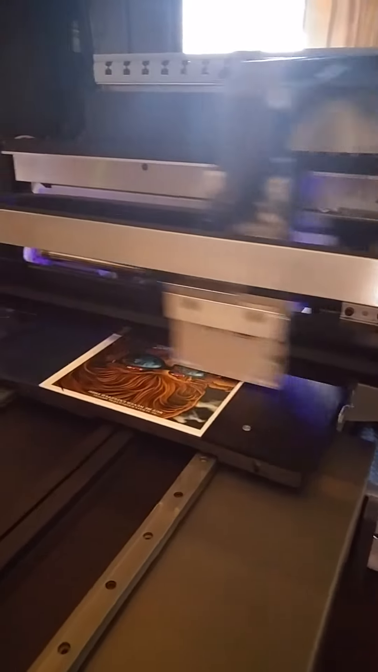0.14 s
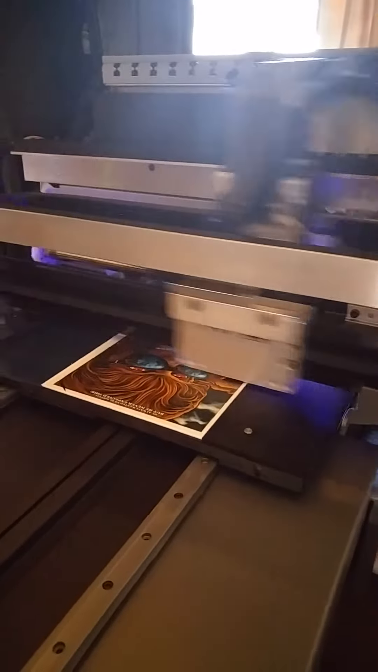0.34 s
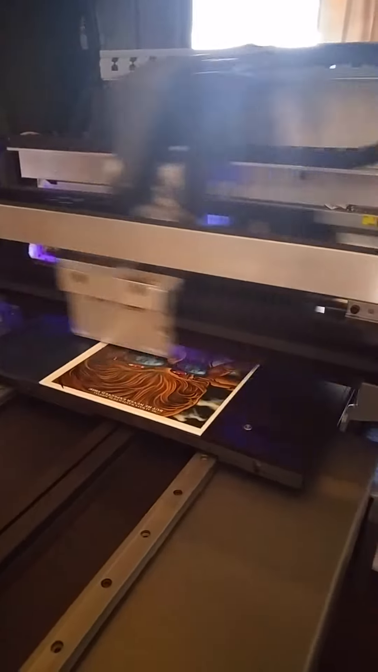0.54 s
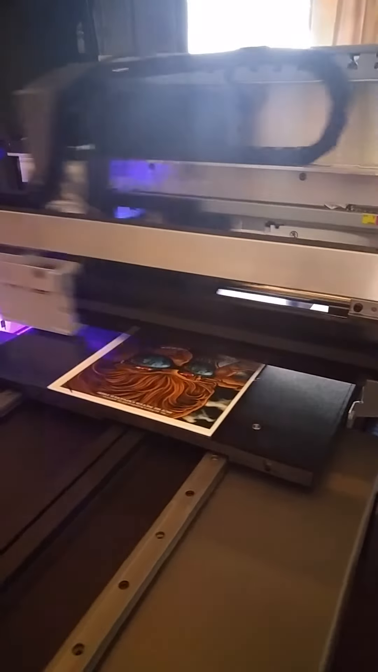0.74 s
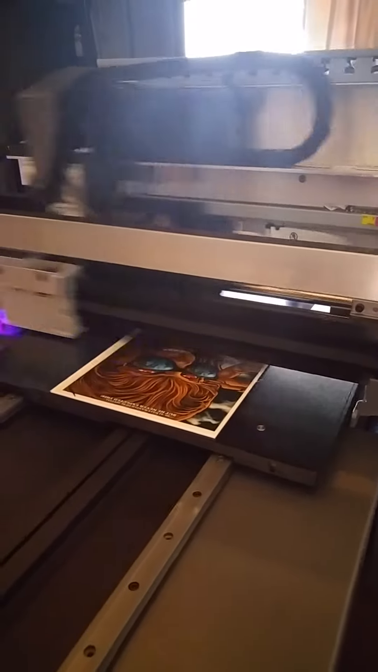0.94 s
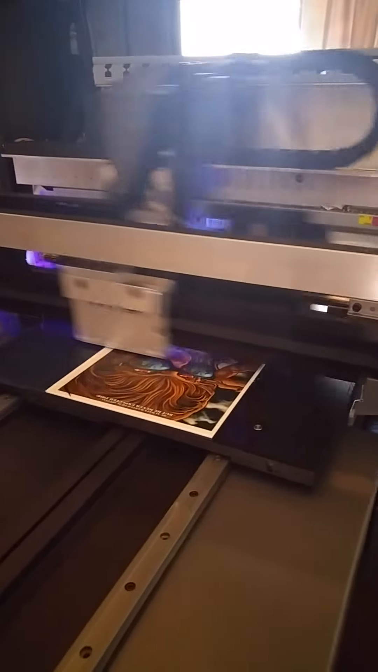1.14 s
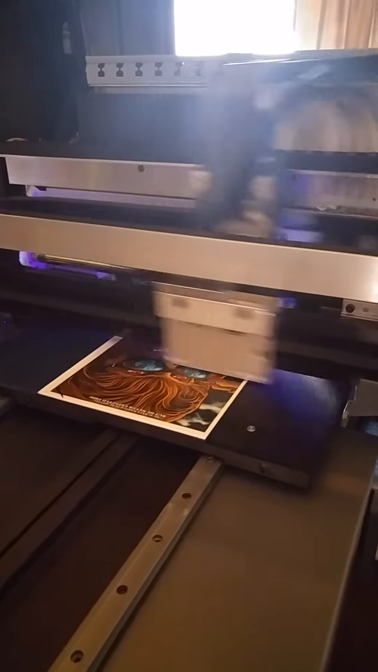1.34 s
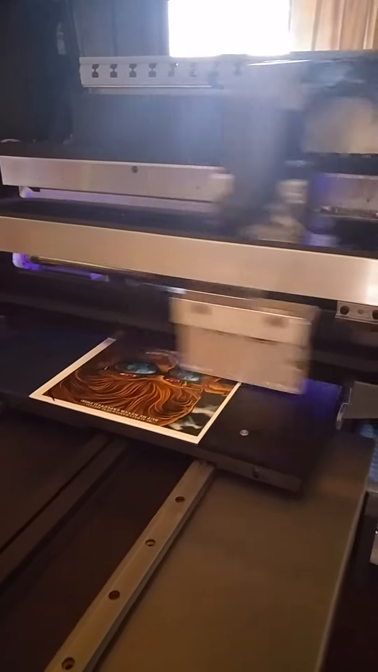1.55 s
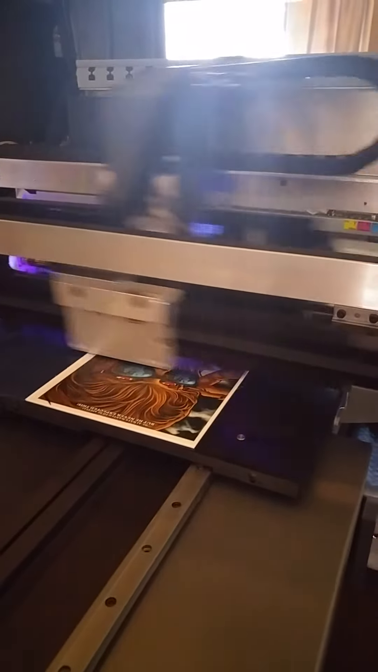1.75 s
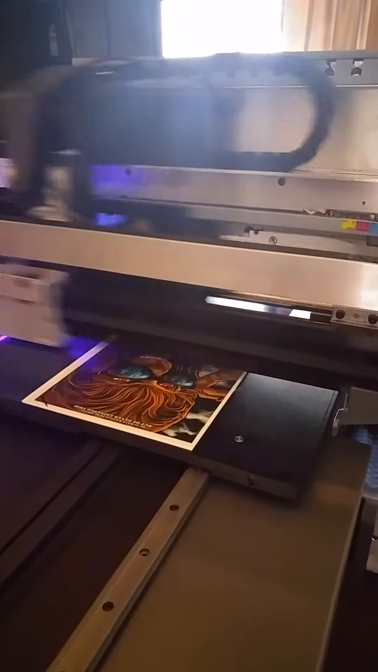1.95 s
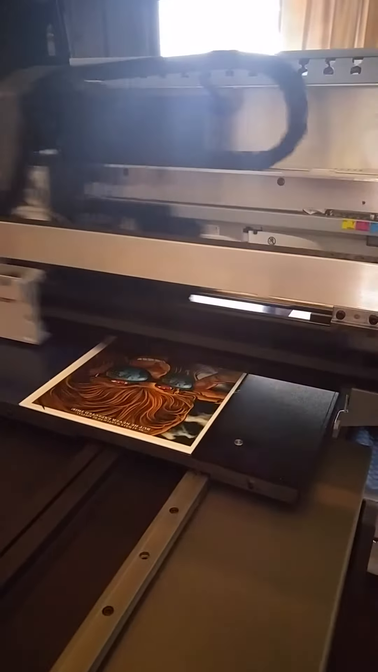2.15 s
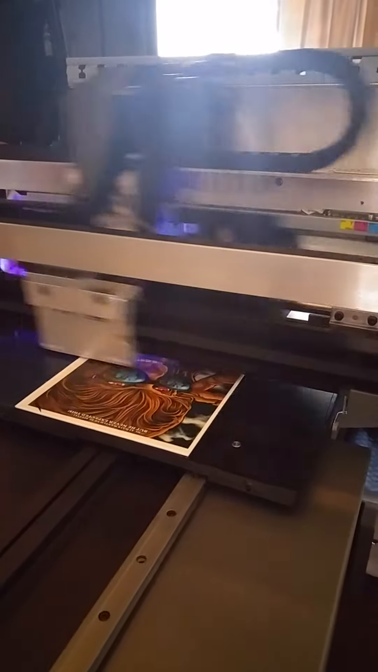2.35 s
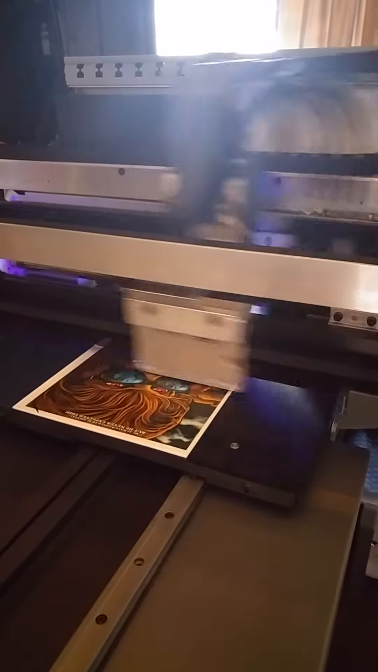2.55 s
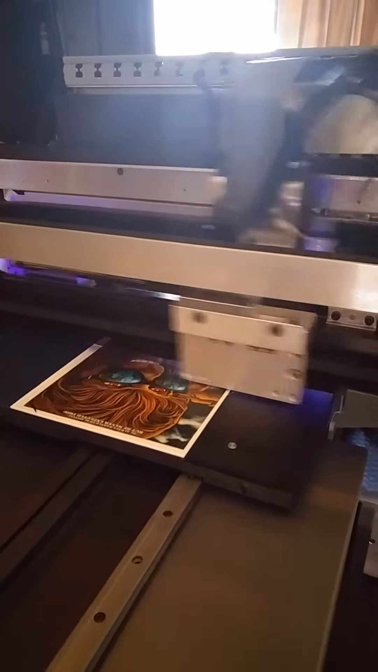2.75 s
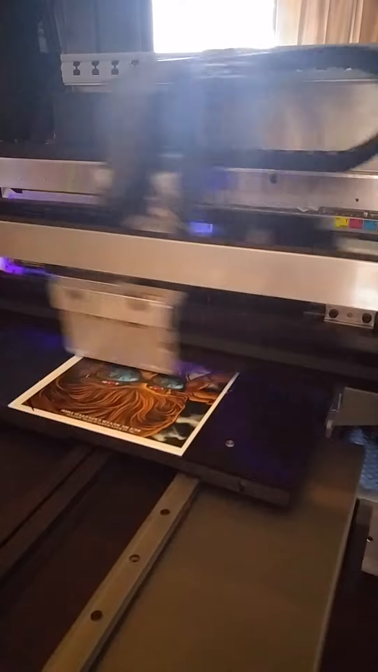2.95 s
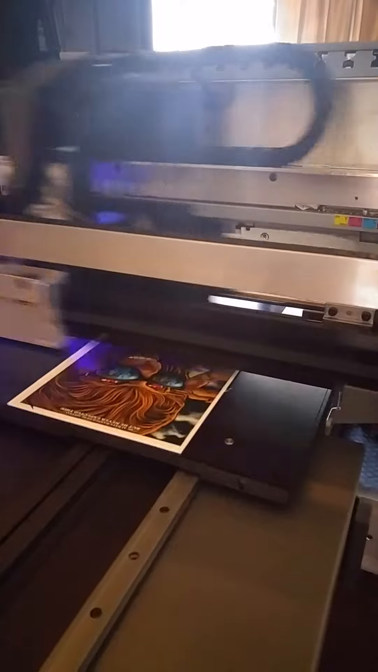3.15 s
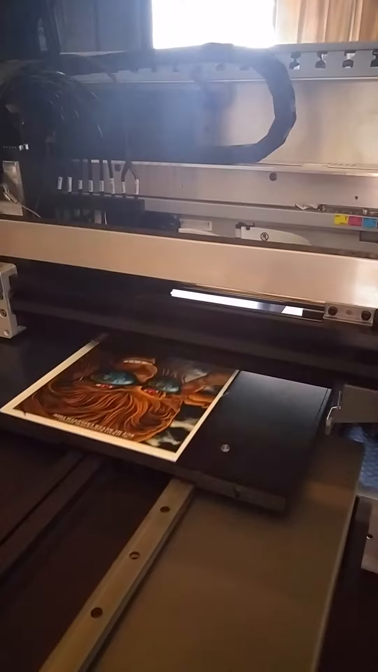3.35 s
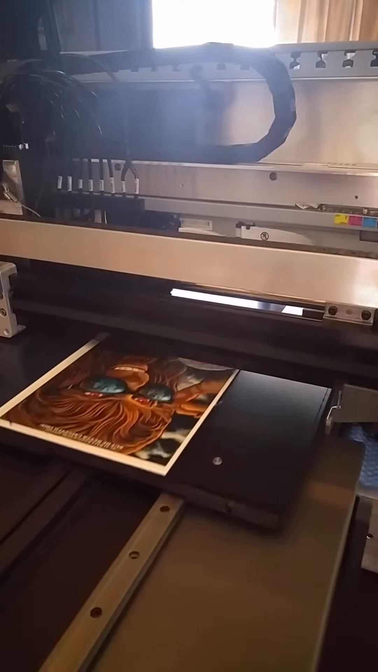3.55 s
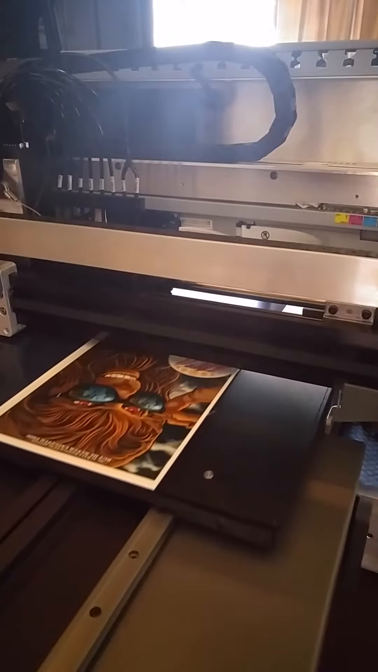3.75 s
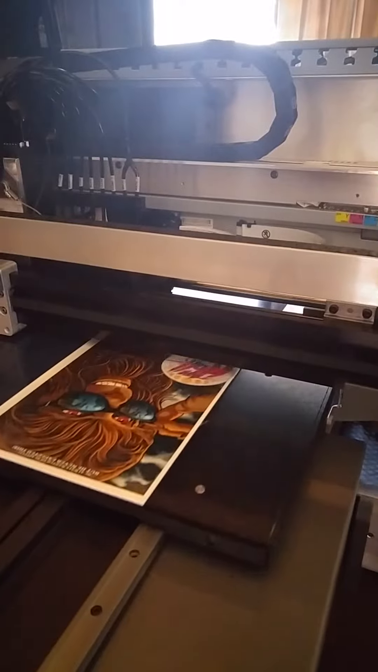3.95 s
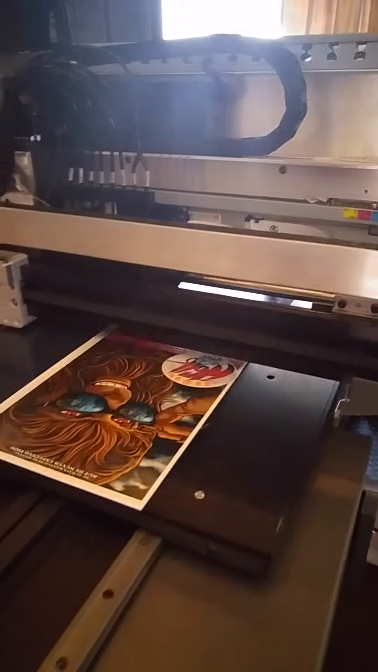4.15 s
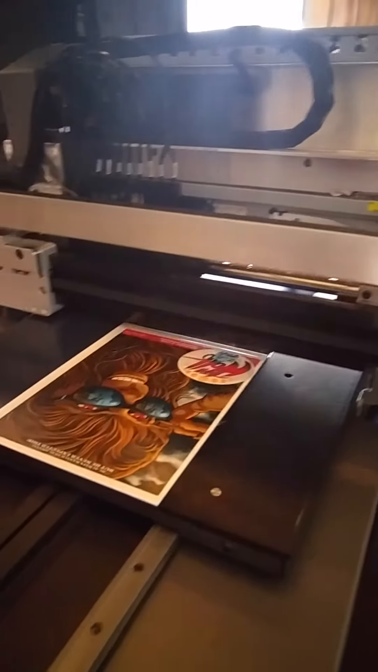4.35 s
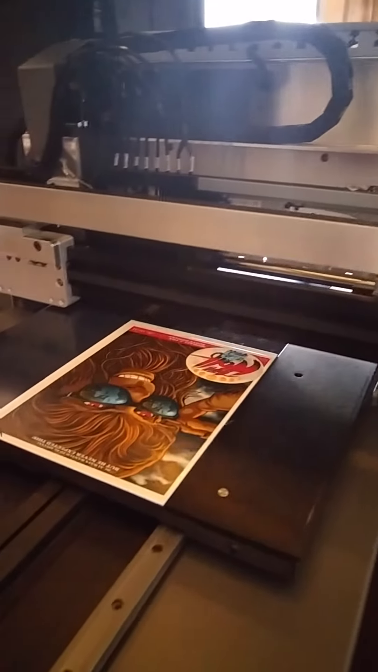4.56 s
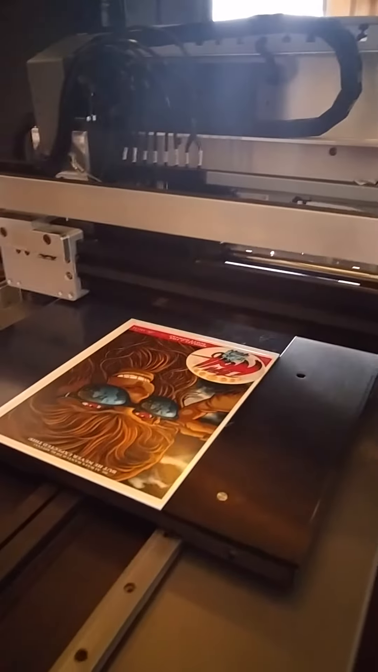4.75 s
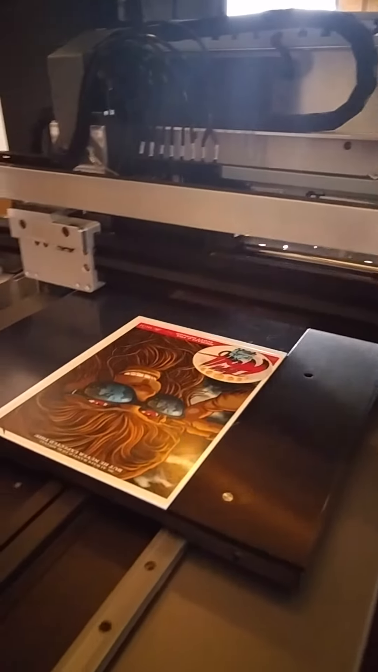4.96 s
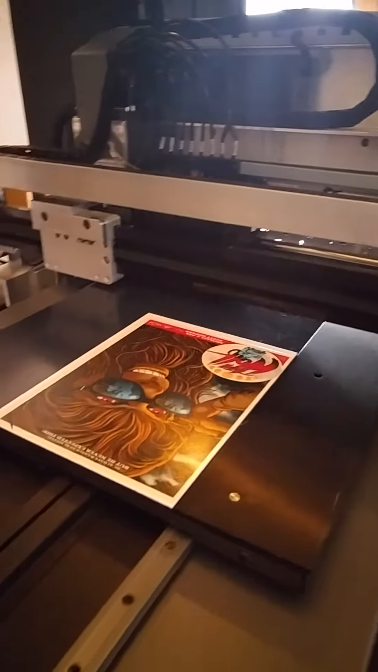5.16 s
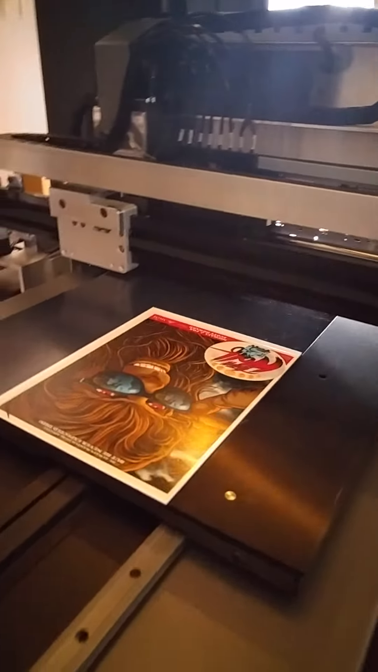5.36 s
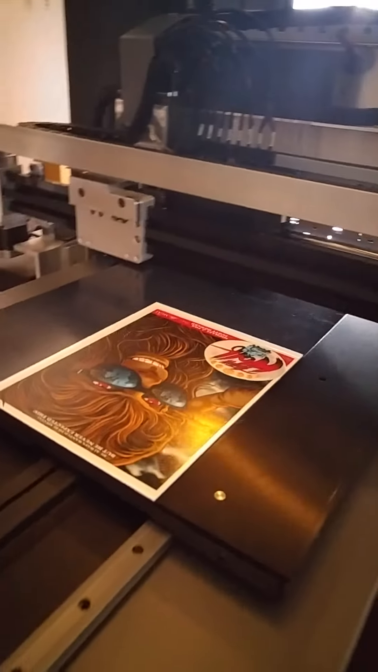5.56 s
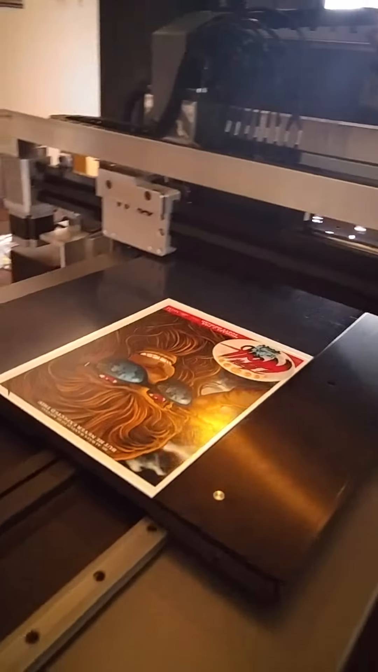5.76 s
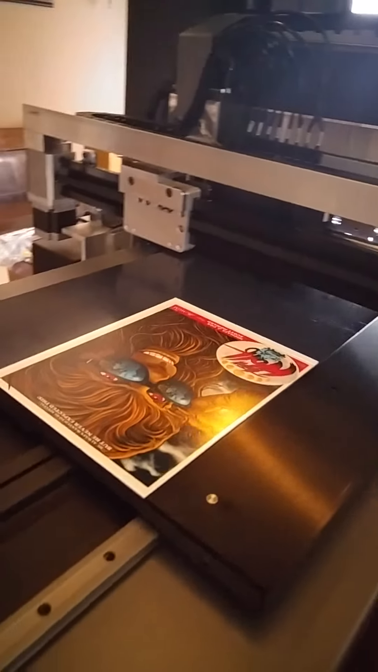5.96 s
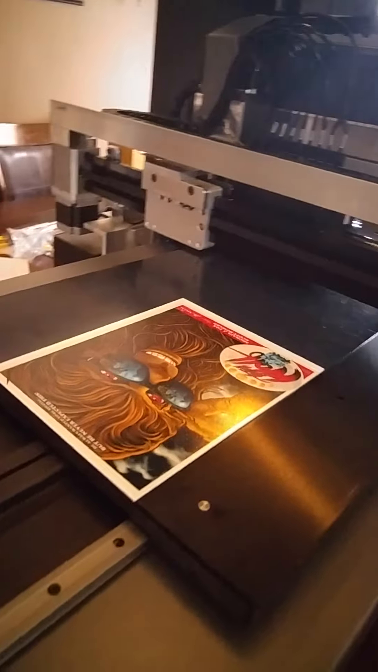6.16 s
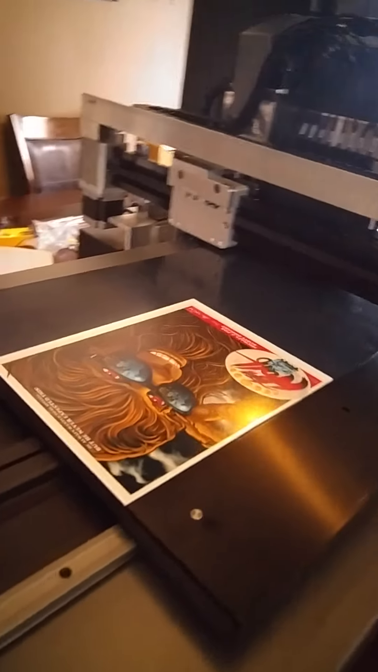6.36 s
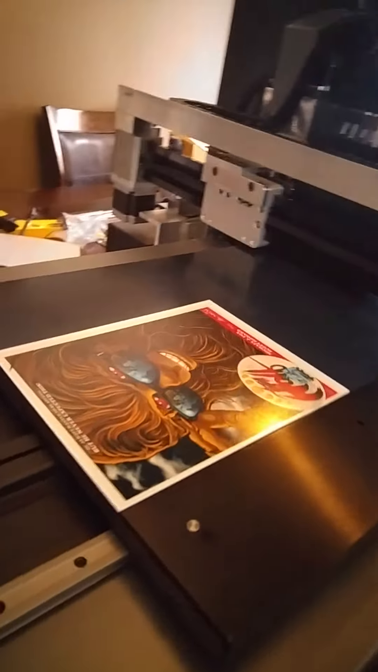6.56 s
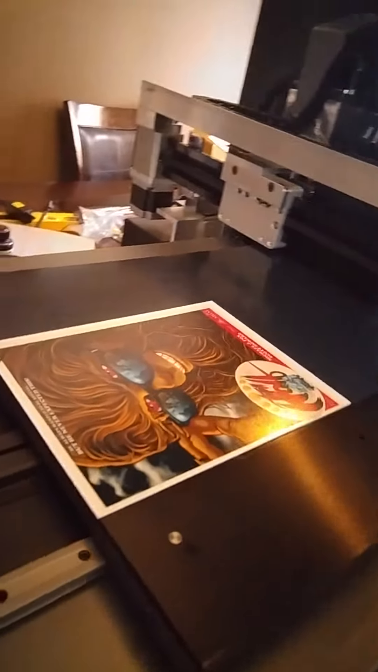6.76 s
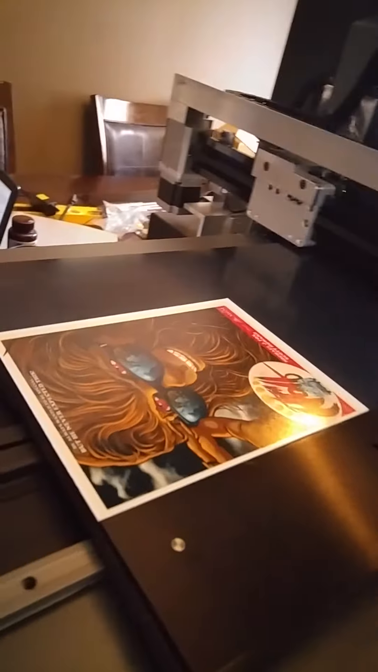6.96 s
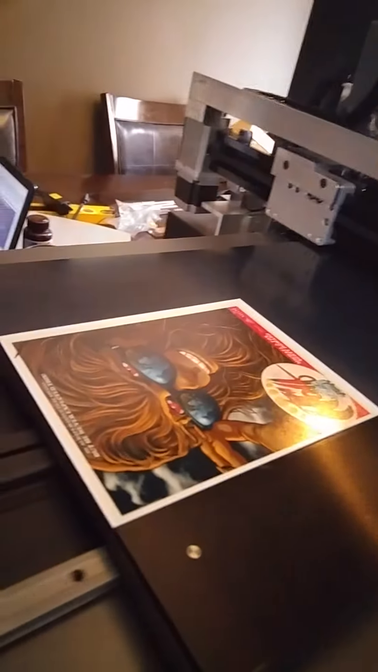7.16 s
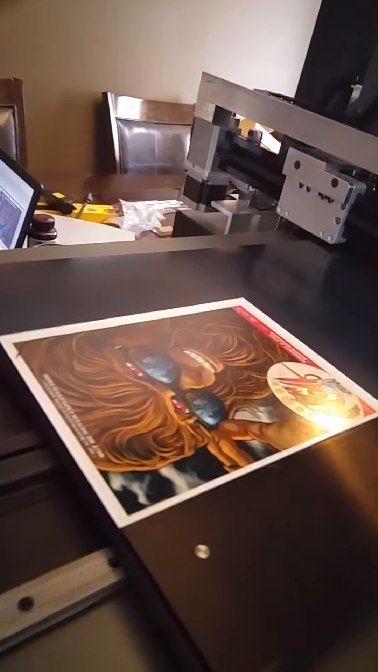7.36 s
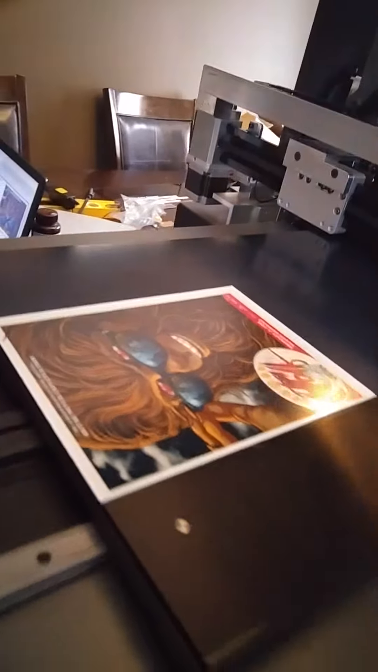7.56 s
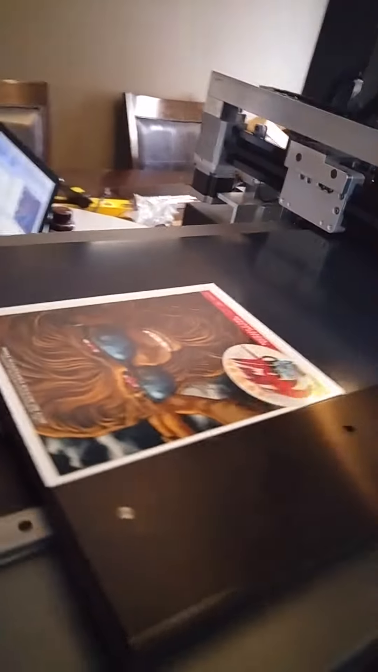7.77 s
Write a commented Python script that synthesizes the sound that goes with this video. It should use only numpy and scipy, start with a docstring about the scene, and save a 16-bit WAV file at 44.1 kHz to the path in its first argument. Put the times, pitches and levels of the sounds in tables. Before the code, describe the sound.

A printer carriage shuttles with rising and dipping motor whines over airy hiss, parks, then a throbbing bed-motor drone continues as the blower winds down.

```python
"""Flatbed printer, parking and printing

The carriage shuttles on its stepper motor: gliding whine, frame ring, rumble, chain rattle, far-end knocks.
A blower hisses and whines on it. The carriage parks and the bed motor drones with shaft-rate side tones.
The blower then runs down over a quieter fan. Tones are sines with a level per port and a left lead;
noises are shaped random spectra partly shared by the two microphone ports.
"""
import sys
import numpy as np
from scipy import signal
from scipy.io import wavfile
from scipy.ndimage import uniform_filter1d, map_coordinates

SR = 44100
rng = np.random.default_rng(int(sys.argv[2]) if len(sys.argv) > 2 else 0)


def log_audio(samples):
    """Write samples as a 16-bit WAV file to the path given in sys.argv[1]."""
    # one column per channel
    frames = np.atleast_2d(samples).T
    # limit to full scale, then quantise
    limited = np.clip(frames, -1, 1)
    pcm = np.round(limited * 32767).astype(np.int16)
    wavfile.write(sys.argv[1], SR, pcm)


N = 344862
T = np.arange(N) / SR


def gain_of(db):
    """Decibels to gain."""
    return 10 ** (np.asarray(db) / 20)


def evened(x):
    """Scales to rms 1."""
    return x / np.sqrt(np.mean(x ** 2) + 1e-20)


def columns(rows, at):
    """Interpolates every column of a table against its first."""
    x, *rest = np.transpose(rows)
    return [np.interp(at, x, c) for c in rest]


def wander(hz):
    """Slow random curve of rms 1, hz knots per second."""
    knots = rng.standard_normal(int(N / SR * hz) + 4)
    return evened(map_coordinates(knots, [T * hz], order=3))


def tone(angle, left_db, right_db, left_lead_rad):
    """A sine at both ports, levels as rms."""
    left = gain_of(left_db) * np.cos(angle)
    right = gain_of(right_db) * np.cos(angle - left_lead_rad)
    return np.sqrt(2) * np.array([left, right])


def resonate(x, hz, width_hz):
    """One-pole resonance of peak gain 1: shift hz down to zero, low-pass, shift back."""
    turn, r = np.exp(2j * np.pi * hz * T), np.exp(-np.pi * width_hz / SR)
    return 2 * (turn * signal.lfilter([1 - r], [1, -r], x / turn)).real


# noise at the ports: hz, likeness_0_1, left_lead_rad, left_minus_right_db
PORT_NOISE = [(40, 0.3, 2.2, -14), (150, 1, 1.6, -3), (402, 0.87, 0.42, -1), (1080, 0.85, 1.47, 0.5),
              (2050, 0.42, 1.75, -0.1), (7540, 0, 0.53, 4.5), (13000, 0, 0.63, 2)]


def noise(spectrum, patchy_db, bands_db=0):
    """Random short-time spectra with drifting patches and lasting bands, partly shared by the ports; rms 1."""
    frames, hz = N // 256 + 5, np.fft.rfftfreq(1024, 1 / SR)

    def read(rows):
        table_hz, *rest = np.transpose(rows)
        return [np.interp(np.log(hz + 1), np.log(table_hz), c)[:, None] for c in rest]

    same, lead, tilt_db = read(PORT_NOISE)
    same = np.clip(same, 0, 1)
    a, b, c, d, patches = rng.standard_normal((frames, 513, 5)).T
    patches = evened(uniform_filter1d(uniform_filter1d(patches, 10, 0), 8, 1))
    knots = uniform_filter1d(rng.standard_normal((2, 513, 8)), size=4, axis=1)
    bands = evened(signal.resample(knots, frames, axis=2)) if bands_db else 0  # nearby surfaces comb each port
    left = a + 1j * b
    right = same * left * np.exp(-1j * lead) + np.sqrt(1 - same ** 2) * (c + 1j * d)
    ports = np.array([left * gain_of(tilt_db / 2), right / gain_of(tilt_db / 2)])
    shape = gain_of(read(spectrum)[0] + patchy_db * patches + bands_db * bands)
    return evened(signal.istft(ports * shape, nperseg=1024, noverlap=768)[1][:, :N])


FIRST_PASS_S, PASS_S = .325, .6133  # a pass starts every PASS_S
BRAKE_S, LAST_BRAKE_S = .494, 3.272  # into the pass; from the beginning
PICKUP_S, STOP_S = .095, .073  # lengths of speeding up and of braking
OUT_LATE_S = .005  # the way out sets off later than the way back
TURN_LEAD_S = .043  # near turn to pass start


def place_s():
    """Seconds of travel from the near end of the rail."""
    return abs((T - FIRST_PASS_S + TURN_LEAD_S + PASS_S) % (2 * PASS_S) - PASS_S)


def trip_s():
    """Seconds into the round trip, way out first."""
    return (T - FIRST_PASS_S) % (2 * PASS_S)


def pass_s():
    """Seconds into the current pass."""
    return (T - FIRST_PASS_S) % PASS_S


def carriage_speed():
    """Share of full speed: rises quickly, holds, falls in a straight line, stays at zero once parked."""
    late_s = OUT_LATE_S * (trip_s() < PASS_S)
    rise = 1 - np.clip(1 - (pass_s() - late_s) / PICKUP_S, 0, 1) ** 4.0
    fall = np.clip(1 - (pass_s() - BRAKE_S) / STOP_S, 0, 1)
    return abs(uniform_filter1d(rise * fall * (T < LAST_BRAKE_S + STOP_S), size=300))


CARRIAGE_HZ = 349  # stepping rate at full speed


def step_angle(speed):
    """Phase of the carriage stepping rate, the running sum of speed."""
    return 2 * np.pi * CARRIAGE_HZ * np.cumsum(speed) / SR


def motor_effort():
    """Gain of the motor: braking is quieter than pulling."""
    return gain_of(-5.5 * uniform_filter1d(1. * (pass_s() > BRAKE_S), size=300))


# fourth multiple of the stepping rate, alike both ways: place_s, left_db, right_db, left_lead_rad
STEP_WHINE = [(.1, -21.5, -23.5, 0.9), (.22, -20, -24, 0.6), (.34, -17.5, -21, 1.5), (.41, -18.5, -21, 1.5),
              (.51, -25.5, -26.5, 1.15)]
# stepping rate itself: trip_s, left_db, right_db, left_lead_rad
STEP_LOW = [(.07, -42, -38.5, 0.96), (.49, -39.5, -36, 0.67), (.74, -61, -53, .2), (1.0, -42.5, -42, 0.86),
            (1.1, -38, -36, 1)]
RETURN_DB = 1.5  # the way back pulls harder


def carriage_motor():
    """Stepper whine at 1, 4 and 8 times the stepping rate, gliding and swelling with speed."""
    speed, trip = carriage_speed(), trip_s()
    angle = step_angle(speed)
    flutter = gain_of(1.14 * wander(60) + RETURN_DB * (trip > PASS_S))
    whine = speed ** 1.32 * motor_effort() * flutter * tone(4 * angle, *columns(STEP_WHINE, place_s()))
    octave = speed ** 4 * gain_of(3 * wander(12)) * tone(8 * angle, -51, -51, 2)
    low = speed ** 4 * gain_of(2 * wander(20)) * tone(angle, *columns(STEP_LOW, trip))
    return whine + octave + low


# resonances of the frame: hz, width_hz, level_db
FRAME_MODES = [(268, 340, -38.5), (668, 137, -23.5), (1041, 128, -18.5)]


def frame_ring():
    """Frame resonances driven by the fourth stepping multiple as it glides through them."""
    speed = carriage_speed()
    drive = (speed > .05) * motor_effort() * tone(4 * step_angle(speed), 0, -0.72, 0.93)
    out = 0
    for hz, width_hz, db in FRAME_MODES:
        out += gain_of(db) * resonate(resonate(drive, hz, 2 * width_hz), hz, width_hz)  # steep skirts
    return out


# carriage rumble spectrum: hz, density_db_per_hz
RAIL_SPECTRUM = [(100, -36), (345, -26), (520, -32.5), (620, -10), (760, -9), (900, -18), (1400, -12),
                 (2200, -68)]


def rail_rumble():
    """Shaped noise of the carriage on its rail, nearly level while it moves."""
    return gain_of(-34.5) * carriage_speed() ** 0.08 * noise(RAIL_SPECTRUM, patchy_db=1.2)


# white noise: hz, density_db_per_hz
WHITE = [(1, 0)]
# two rattles on the way back: trip_s, level_db, half_length_s
CHAIN_RATTLES = [(0.82, -28, .035), (1.05, -30, 0.056)]
CHAIN_REST_DB = -45  # between rattles


def cable_chain():
    """Noise through a narrow resonance, swelling twice in each round trip."""
    links = resonate(resonate(noise(WHITE, patchy_db=1.5), 1515, 160), 1518, 28)
    level = gain_of(CHAIN_REST_DB)
    for s, db, half_s in CHAIN_RATTLES:
        level = level + gain_of(db) * np.exp(-((trip_s() - s) / half_s) ** 4)
    return level * evened(links) * (T < LAST_BRAKE_S)


# blade tone while riding: place_s, left_db, right_db, left_lead_rad
BLADE_RIDING = [(.03, -34.5, -33.5, 3.7), (.12, -31, -35.5, 1), (.37, -36, -41, 0.94),
                (.49, -30.5, -46, 2.7), (.61, -35.5, -47, 3.4)]
# its second multiple while riding: place_s, left_db, right_db, left_lead_rad
BLADE_2_RIDING = [(0, -34, -48, 1.5), (.1, -38, -46, -1.5), (.2, -44, -45, -1.8), (.32, -48, -49, -3.2),
                  (.46, -40, -50, -3), (.6, -38, -49, -4.5)]
# blade tone once parked: time_s, left_db, right_db, left_lead_rad
BLADE_PARKED = [(3.3, -35, -43, 4.2), (5.46, -32.5, -39.5, 4.1), (5.49, -44, -41, 5.1)]
# its second multiple once parked: time_s, left_db, right_db, left_lead_rad
BLADE_2_PARKED = [(3.5, -41.5, -47, -.6), (4.1, -38, -49, 0), (4.85, -45, -40, -1.5), (5.3, -50, -52, -1.5)]
# weak tones: shaft_multiple
WEAK_MULTIPLES = [16, 84, 112]
# the same tones in order: left_db, right_db, left_lead_rad
WEAK_PORTS = [(-49.5, -52, 1.2), (-41.5, -58, 2.3), (-43, -50, 2.8)]
# air hiss spectrum: hz, density_db_per_hz
HISS_SPECTRUM = [(800, -21), (1400, -7.5), (1780, -10.5), (1950, -13.5), (2670, -14), (2910, -21),
                 (3580, -11.5), (3950, -20.5), (4250, -14.5), (4550, -19.5), (5060, -11.5), (6230, -15),
                 (7100, -7), (7800, -11.5), (8500, -3), (12700, -19), (15800, -25.5)]
# air hiss level: time_s, level_db
HISS_COURSE = [(0, -25.5), (3.29, -25), (3.4, -29.5), (4.2, -26.5), (5.45, -27)]
BLOWER_HZ, BLADE_COUNT = 62.34, 28  # shaft speed before switch-off
OFF_S, RUNDOWN_S = 5.475, .34  # switch-off, time constant of slowing


def blower():
    """Blade tone, multiples and shaft-pulsed air hiss; all sink as the rotor slows, high multiples faster."""
    speed = np.exp(-np.maximum(T - OFF_S, 0) / RUNDOWN_S)
    hunting = 1 + 0.000195 * wander(3.92)
    angle = 2 * np.pi * BLOWER_HZ * np.cumsum(speed * hunting) / SR
    moving = T < BLADE_PARKED[0][0]
    ports = np.where(moving, columns(BLADE_RIDING, place_s()), columns(BLADE_PARKED, T))
    ports_2 = np.where(moving, columns(BLADE_2_RIDING, place_s()), columns(BLADE_2_PARKED, T))
    tones = tone(BLADE_COUNT * angle, *ports)
    tones += speed ** 12 * gain_of(2.2 * wander(9.8)) * tone(2 * BLADE_COUNT * angle, *ports_2)
    for k, weak_ports in zip(WEAK_MULTIPLES, WEAK_PORTS):
        tones += speed ** (k / 3) * gain_of(2.2 * wander(5)) * tone(k * angle, *weak_ports)
    tones *= speed ** 2.6 * gain_of(4 * wander(45) * (T > OFF_S))  # the glide breaks up on room resonances
    pulsing = gain_of(0.8 * np.cos(angle) + 0.35 * np.cos(2 * angle) + 0.4 * wander(40))
    hiss = gain_of(columns(HISS_COURSE, T)[0]) * noise(HISS_SPECTRUM, patchy_db=0.8, bands_db=2.2)
    return tones + hiss * pulsing * speed ** 2.65


# fan noise spectrum: hz, density_db_per_hz
FAN_SPECTRUM = [(60, -19), (230, -16), (400, -12.5), (520, -18.5), (800, -9.5), (1250, -19), (1830, -25.5),
                (1950, -20.5), (2070, -28), (3500, -31.5), (6900, -31.5), (7200, -23), (7420, -27),
                (7800, -32), (8800, -18), (10000, -28), (15800, -39.5)]
# the microphone backs away: time_s, change_db
FAN_COURSE = [(5.8, -1.5), (7.8, -4.5)]
# steady tone: hz, left_db, right_db, left_lead_rad
FAN_HUM = (347.6, -53.5, -53, 1.0)
# low hum, beats slowly with the bed: time_s, left_db, right_db, left_lead_rad
LOW_HUM = [(3.3, -51.5, -50.5, .8), (6.5, -47, -45, 1.2)]
FAN_DB, HUM_HZ, HUM_START_RAD = -37, 297.49, .84


def fan():
    """Fan noise and two hum tones under everything."""
    hz, *ports = FAN_HUM
    hum = tone(2 * np.pi * hz * T, *ports)
    hum += tone(2 * np.pi * HUM_HZ * T + HUM_START_RAD, *columns(LOW_HUM, T))
    return hum + gain_of(FAN_DB + columns(FAN_COURSE, T)[0]) * noise(FAN_SPECTRUM, patchy_db=1.97)


THUD_DB, THUD_HALF_S = -34.5, 0.076
THUD_NEAR_HZ, THUD_FAR_HZ = 295, 340


def turn_thuds():
    """Dull resonant noise swelling while the carriage turns round, pitched by the end of the rail."""
    to_turn = (T - FIRST_PASS_S + 0.015 + PASS_S / 2) % PASS_S - PASS_S / 2
    swell = gain_of(THUD_DB) * np.exp(-(to_turn / THUD_HALF_S) ** 2) * (T < LAST_BRAKE_S + .12)
    ring_hz = np.where(place_s() > PASS_S / 2, THUD_FAR_HZ, THUD_NEAR_HZ)
    return swell * evened(resonate(resonate(noise(WHITE, patchy_db=1.5), ring_hz, 220), ring_hz, 42))


# as the brake bites at the far end: start_s, blow_db
KNOCK_BLOWS = [(0.821, -26.5), (2.047, -26), (3.273, -27)]
# modes relative to the blow: hz, level_db, t60_s
KNOCK_MODES = [(1130, 9.5, 0.032), (2300, 0, 0.035)]
SHAKE_DB, SHAKE_T60_S = 0, .15  # relative to the blow


def far_knocks():
    """Each blow rings short modes and a dull, grainy tick; loose covers sizzle after it."""
    t = np.arange(3000) / SR
    ring = sum(gain_of(db - 60 * t / t60_s) * np.sin(2 * np.pi * hz * t) for hz, db, t60_s in KNOCK_MODES)
    grain = uniform_filter1d(rng.standard_normal(len(t)), size=6)
    ring += gain_of(11 - 60 * t / 0.045) * np.minimum(t / 0.0007, 1) * grain
    blows = np.zeros(N)
    for s, db in KNOCK_BLOWS:
        blows[round(s * SR)] = gain_of(db)
    sizzle = signal.oaconvolve(blows, gain_of(SHAKE_DB - 60 * t / SHAKE_T60_S))[:N]
    return signal.oaconvolve(blows, ring)[:N] + sizzle * noise(HISS_SPECTRUM, patchy_db=1)


# soon after setting off back: peak_s, level_db
RETURN_TICKS = [(1.021, -34), (2.248, -33)]
TICK_HZ, TICK_WIDTH_HZ, TICK_HALF_S = 3810, 1300, 0.015


def return_ticks():
    """Faint puffs of band-limited noise."""
    puffs = sum(gain_of(db) * np.exp(-((T - s) / TICK_HALF_S) ** 2) for s, db in RETURN_TICKS)
    return puffs * evened(resonate(rng.standard_normal(N), TICK_HZ, TICK_WIDTH_HZ))


BED_ON_S, BED_RISE_S = 3.3, 0.062


def bed_rise():
    """Gain of the bed as it takes off."""
    return np.clip((T - BED_ON_S) / BED_RISE_S, 0, 1) ** 3


# the microphone swings round: time_s, share_to_second_place, loss_db_per_multiple_above_4,
# fourth_multiple_lead_stray_rad
MIC_SWING = [(3.9, 0.09, 0, 0), (5.0, 0.27, 0.5, -.4), (5.7, 0.58, 0.5, .15), (6.3, 0.97, -0.24, .65),
             (7.0, 1, -0.3, -.2), (7.82, 0.95, -2.5, -.1)]
# partials: stepping_multiple, shaft_turns_added
BED_PARTIALS = [(k, 0) for k in (1, 2, 3, 4, 5, 6, 8)] + [(4, -1), (4, 1), (4, 2), (8, -1)]
# the same partials at two places: left_db_1, right_db_1, left_lead_rad_1,
# left_db_2, right_db_2, left_lead_rad_2, slip_rad_between
BED_PORTS = [(-46.8, -41, 0.96, -61, -54, -0.9, -1.35), (-34.5, -32.5, 1.1, -40, -36, 1.44, -1.3),
             (-59, -40, 1.3, -47.5, -41, 0.94, -1.8), (-25.6, -25.2, .15, -21.6, -23.2, -3.7, -.9),
             (-34.5, -42, -0.35, -36.5, -42, -5.3, -0.47), (-48, -53, -.2, -52, -47, .2, -2.2),
             (-38.5, -28.5, -0.12, -32.5, -32.5, 0.87, -1.16), (-47, -46, -.05, -45.5, -46.3, .58, .03),
             (-33.5, -32.5, -.89, -36, -43, -1.18, -.85), (-41, -44, -1.6, -44.5, -41, -.24, -.3),
             (-46, -46, -.4, -49, -46, .3, -1.6)]
# second multiple on the way: time_s, change_db
SECOND_COURSE = [(3.5, -5), (4.2, 1), (5.2, 2), (5.8, 3.5), (6.4, -5.5), (7.0, 4.5), (7.3, -3), (7.8, 1.5)]
BED_HZ, SHAFT_HZ, SHAFT_START_RAD = 149.66, 13.39, 1.4
SETTLE_DB, SETTLE_S = 6, 0.58  # the fourth multiple starts louder and settles


def bed_motor():
    """Multiples of the stepping rate; side tones whole shaft turns apart make the drone throb."""
    angle = 2 * np.pi * BED_HZ * T
    shaft = 2 * np.pi * SHAFT_HZ * T + SHAFT_START_RAD
    share, loss_db, stray = columns(MIC_SWING, T)
    share, out = np.clip(share, 0, 1), 0
    for (k, turns), ports in zip(BED_PARTIALS, BED_PORTS):
        l1, r1, lead1, l2, r2, lead2, slip = ports
        flipped = (k, turns) in BED_PARTIALS[-2:]
        a = k * (angle + k) + turns * shaft + np.pi * flipped  # own phase per multiple: a round drone
        db = (0.4 + .3 * abs(turns)) * wander(3.1)  # the drive runs unevenly
        db += loss_db * max(k - 4, 0)
        db += SETTLE_DB * np.exp(-abs(T - BED_ON_S) / SETTLE_S) * ((k, turns) == (4, 0))
        db += columns(SECOND_COURSE, T)[0] * (k == 2)
        first = (1 - share) * tone(a, l1, r1, lead1)
        second = share * tone(a + slip, l2, r2, lead2 + stray * (k == 4))
        out += gain_of(db) * (first + second)  # blended as waves: a tone can cancel at one port
    return out * bed_rise()


# thin steady tones: hz, left_db_1, right_db_1, left_db_2, right_db_2, left_lead_rad
BED_THIN = [(620.35, -41.5, -44, -50, -45, -.9), (695.4, -41, -44, -56, -50, .3)]


def bed_lines():
    """Thin tones of the bed drive, levels following the microphone's swing."""
    share, out = np.clip(columns(MIC_SWING, T)[0], 0, 1), 0
    for hz, l1, r1, l2, r2, lead in BED_THIN:
        out -= tone(2 * np.pi * hz * T, l1 + share * (l2 - l1), r1 + share * (r2 - r1), lead)
    return out * bed_rise()


# noise bands of the bed drive, two broad, and a thin one beside the eighth multiple:
# hz, width_hz, first_db, last_db
BED_BANDS = [(632, 25, -41, -50), (753, 270, -36.5, -58), (1170.5, 5, -48, -51)]


def bed_noise():
    """Noise bands of the bed drive: white noise filtered to each band, its level sliding in dB."""
    since = T - BED_ON_S
    source, run, out = noise(WHITE, patchy_db=0.5), np.clip(since / since[-1], 0, 1), 0
    for hz, width_hz, db1, db2 in BED_BANDS:
        band = evened(resonate(resonate(source, hz, 3 * width_hz + 30), hz, width_hz))
        out += gain_of(db1 + (db2 - db1) * run) * band
    return out * bed_rise()


JOLT_DB, JOLT_RISE_S, JOLT_HOLD_S, JOLT_FALL_S = -18, 0.007, 0.024, 0.025


def bed_jolt():
    """The take-off jolt rings the plate: two tones in a short pulse."""
    since = T - BED_ON_S
    fall = 1 - (since - JOLT_RISE_S - JOLT_HOLD_S) / JOLT_FALL_S
    pulse = np.clip(np.minimum(since / JOLT_RISE_S, fall), 0, 1) ** 2
    ring = tone(2 * np.pi * 622 * T, JOLT_DB, JOLT_DB, 0.74)
    ring += tone(2 * np.pi * 345 * T, JOLT_DB - 10, JOLT_DB - 6.5, 0.94)
    return pulse * ring


def scene():
    """All sources together."""
    carriage = carriage_motor() + frame_ring() + rail_rumble() + cable_chain()
    air = blower() + fan()
    reversals = turn_thuds() + far_knocks() + return_ticks()
    bed = bed_motor() + bed_lines() + bed_noise() + bed_jolt()
    return carriage + air + reversals + bed


EDGE_HZ = 15800


def record(dry):
    """The microphone loses the deepest bass; then the band limit."""
    thin = signal.sosfilt(signal.butter(4, 52, "high", fs=SR, output="sos"), dry)
    low_pass = signal.firwin(1023, EDGE_HZ, window=("kaiser", 12), fs=SR)
    return signal.oaconvolve(thin, low_pass[None], "same")


dry = scene()
out = record(dry)
log_audio(out)
```